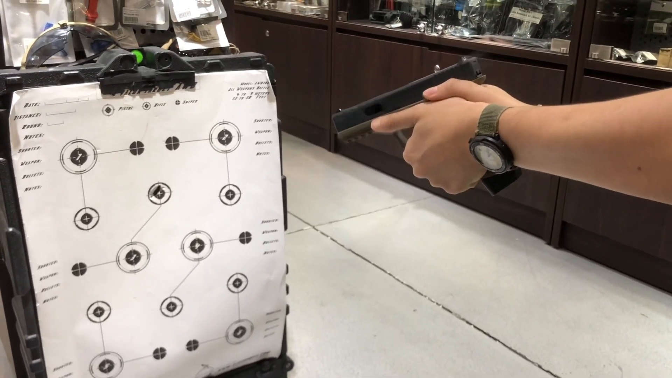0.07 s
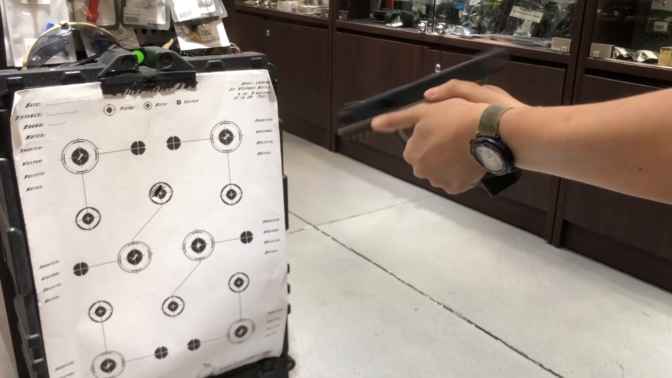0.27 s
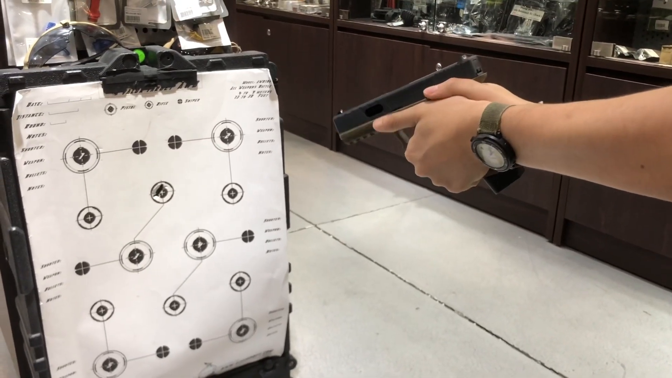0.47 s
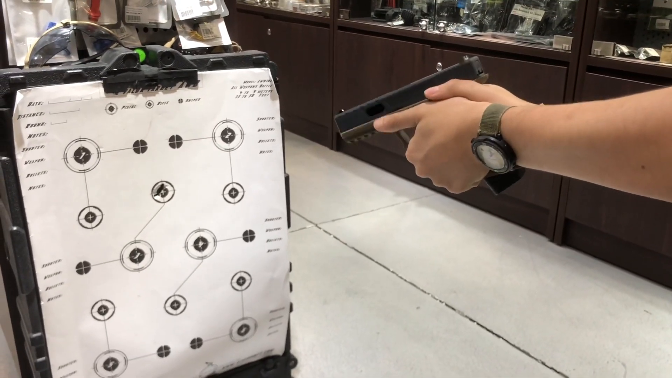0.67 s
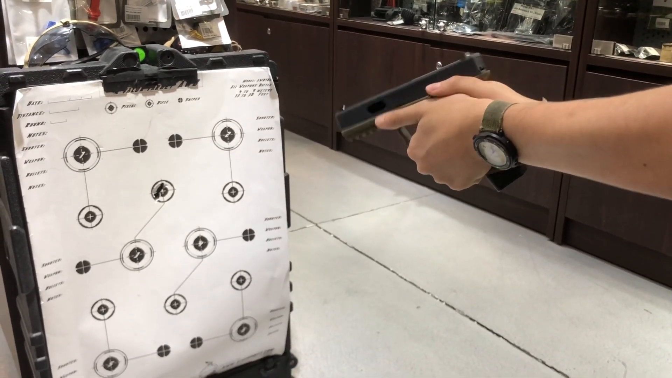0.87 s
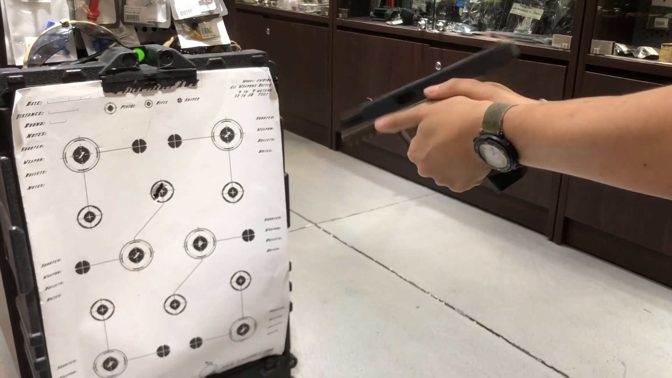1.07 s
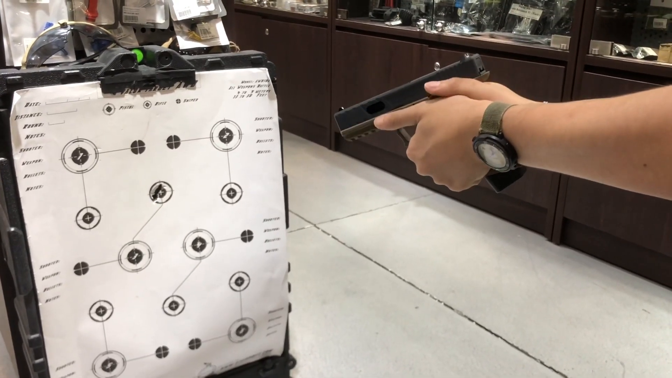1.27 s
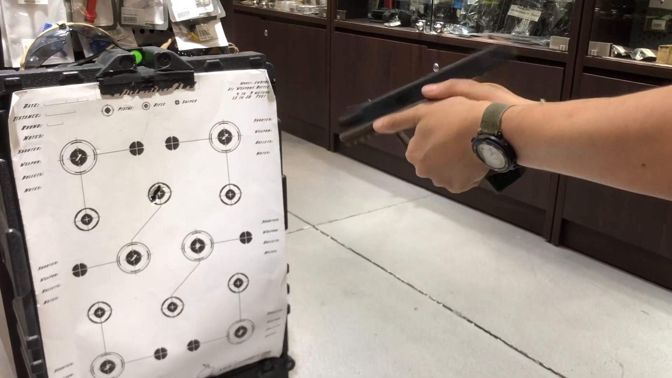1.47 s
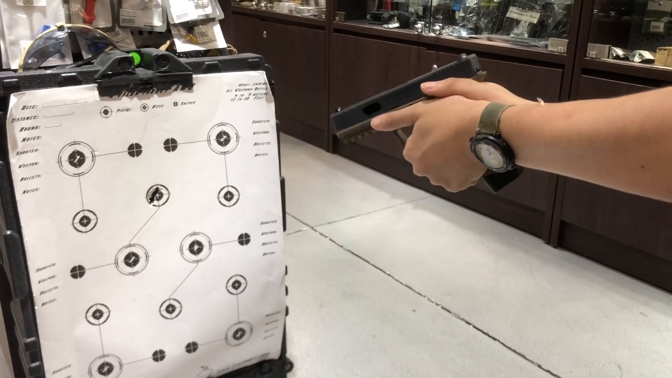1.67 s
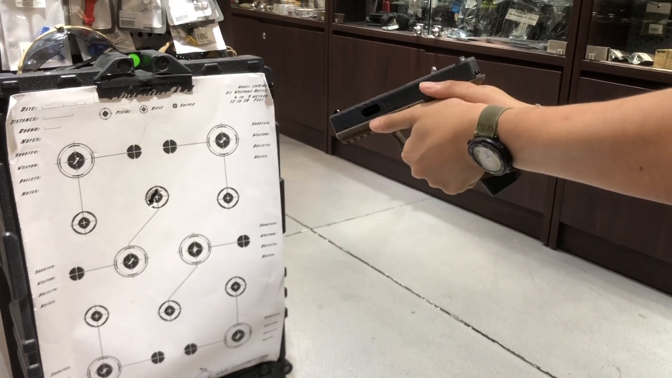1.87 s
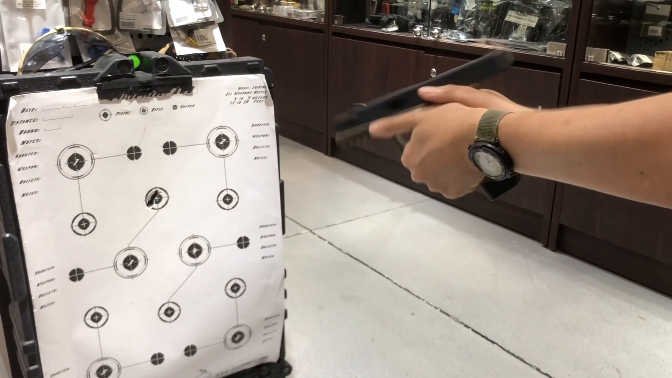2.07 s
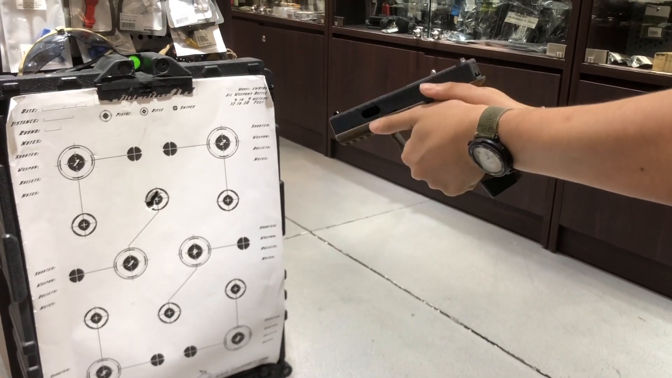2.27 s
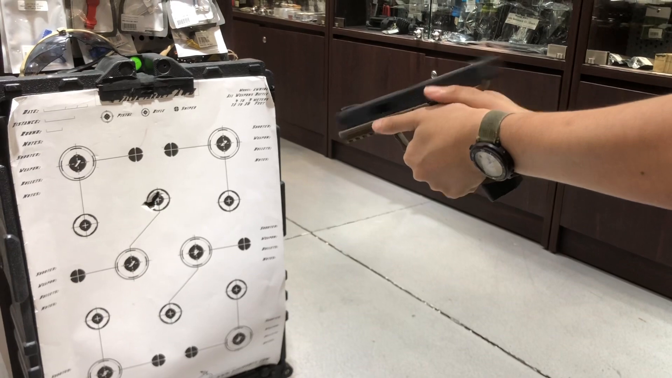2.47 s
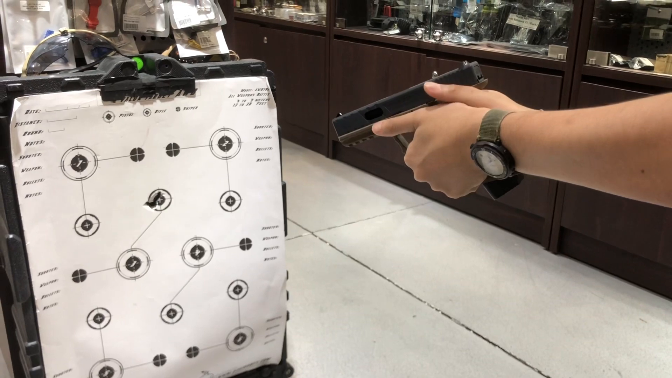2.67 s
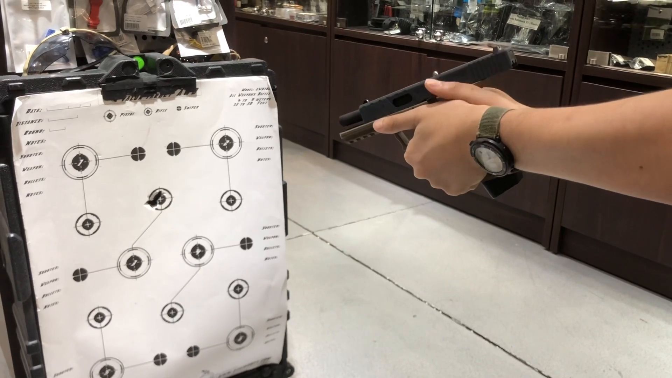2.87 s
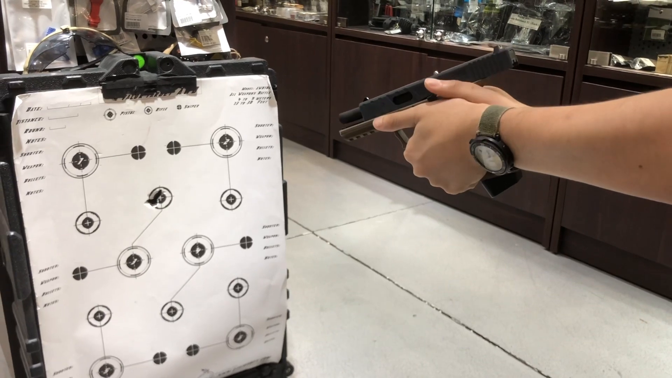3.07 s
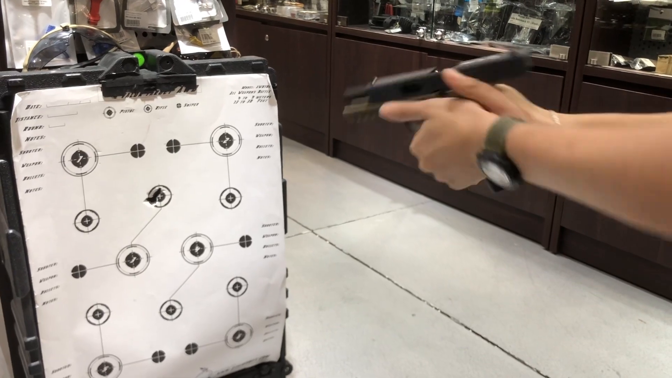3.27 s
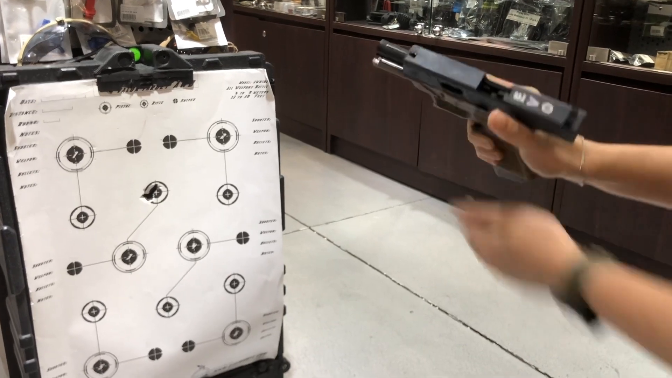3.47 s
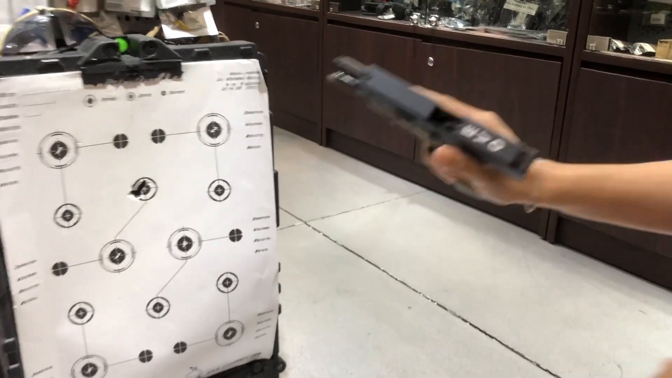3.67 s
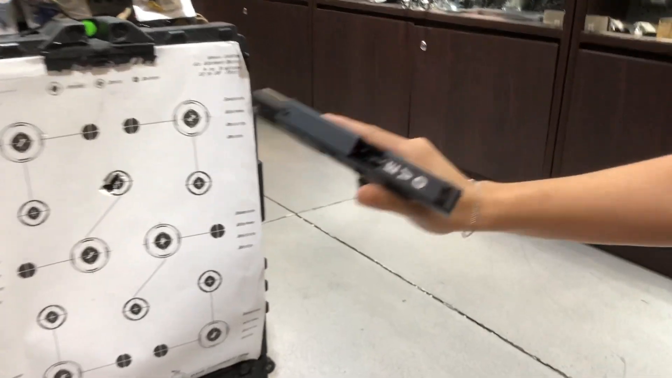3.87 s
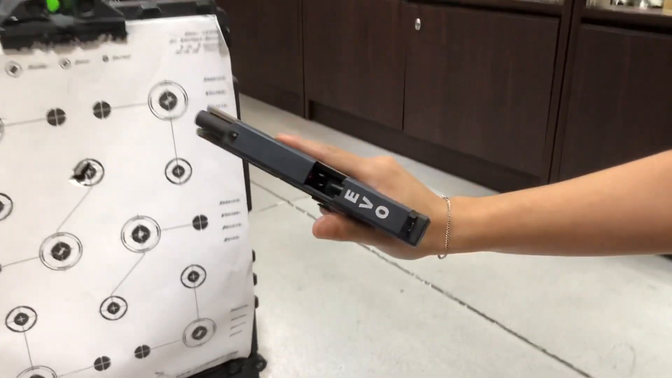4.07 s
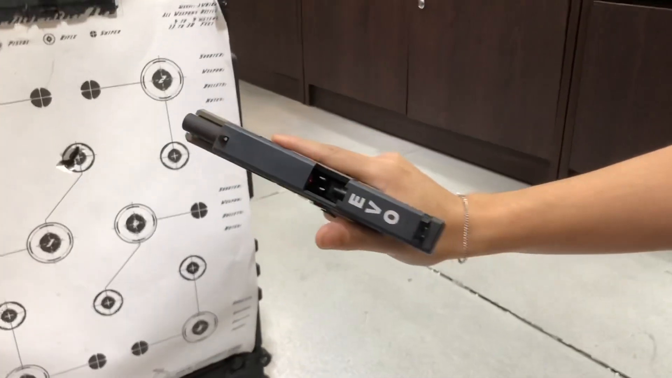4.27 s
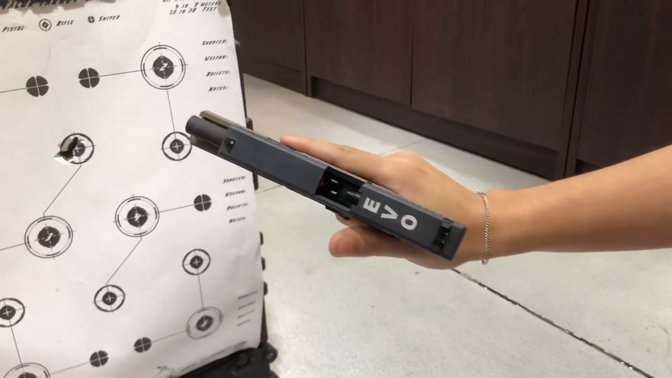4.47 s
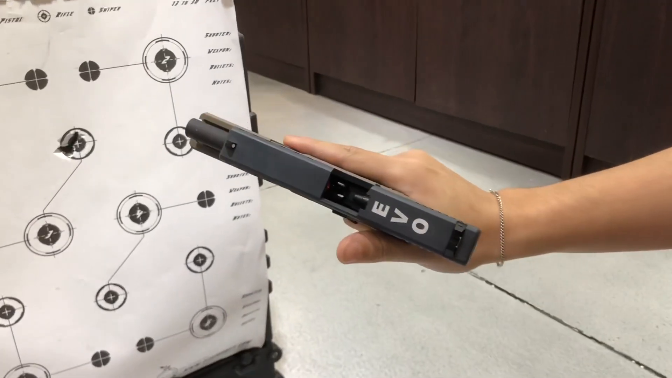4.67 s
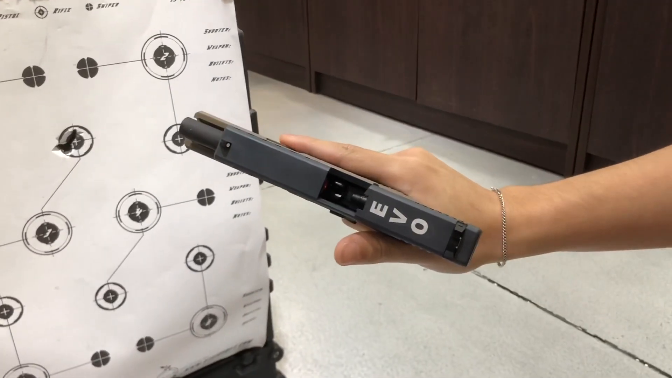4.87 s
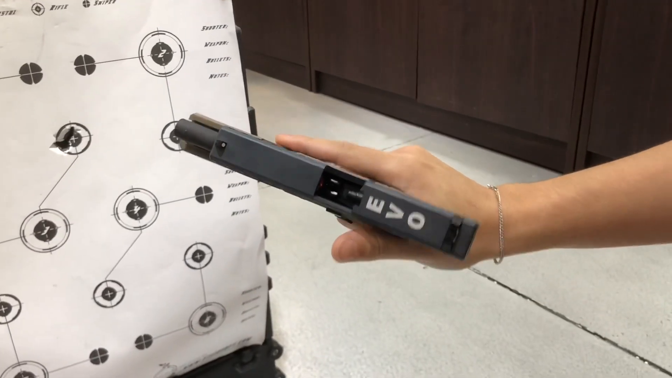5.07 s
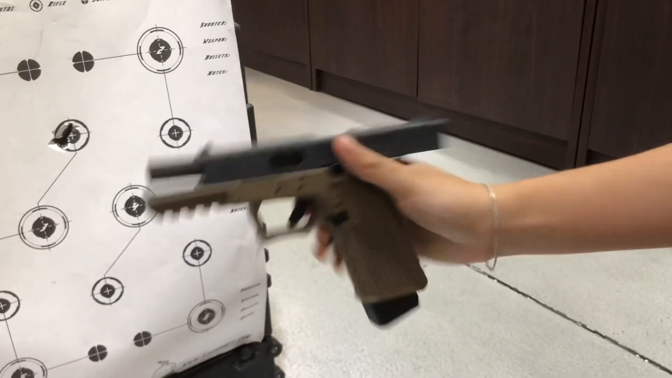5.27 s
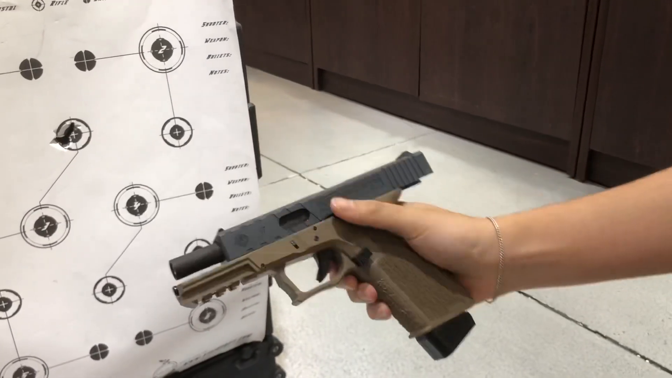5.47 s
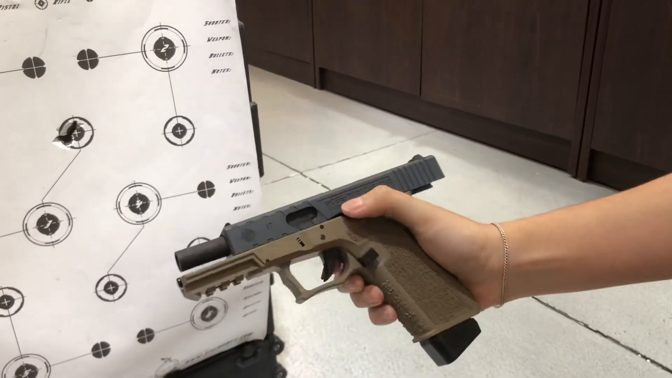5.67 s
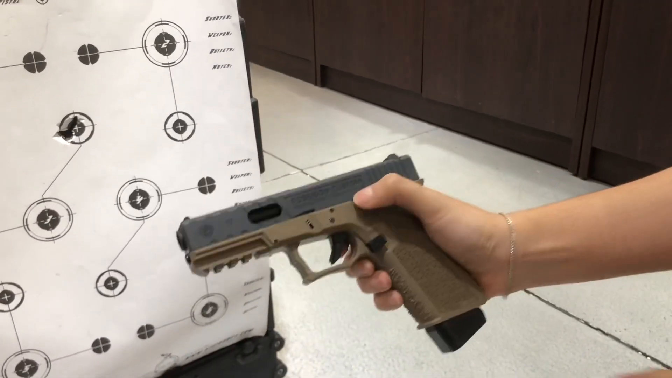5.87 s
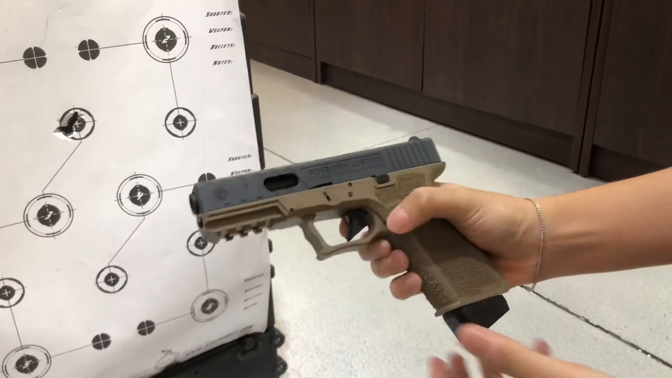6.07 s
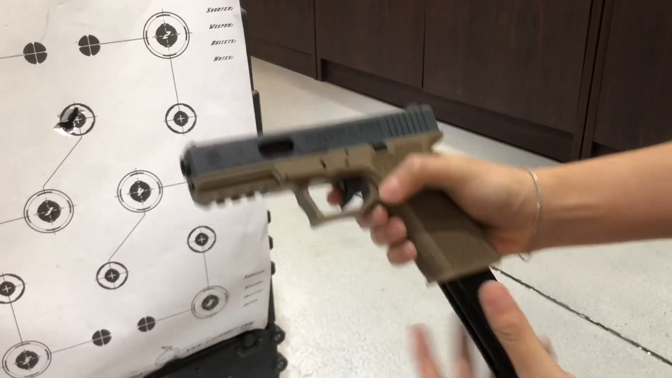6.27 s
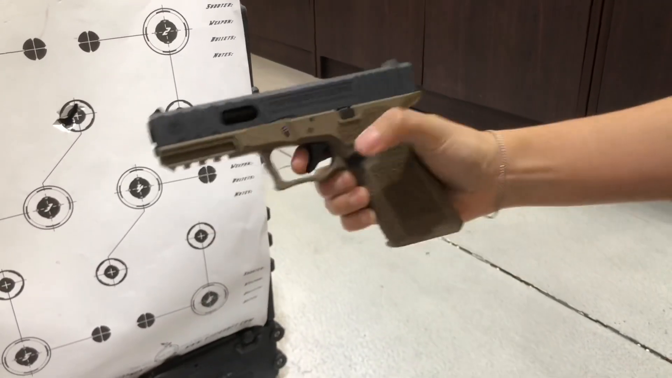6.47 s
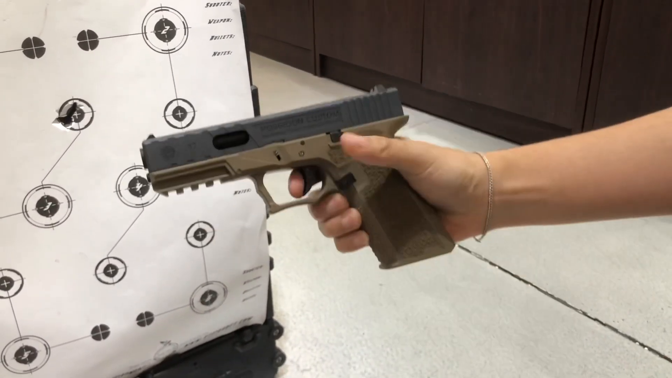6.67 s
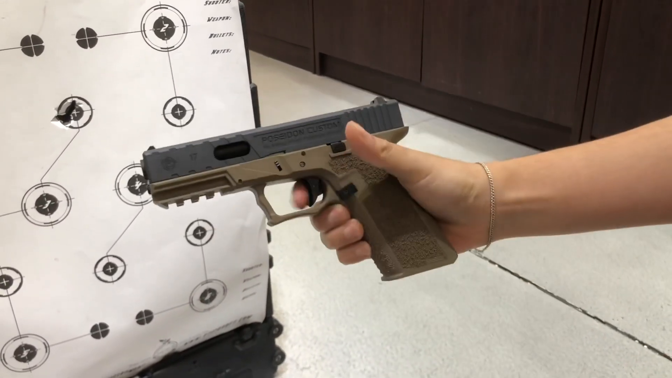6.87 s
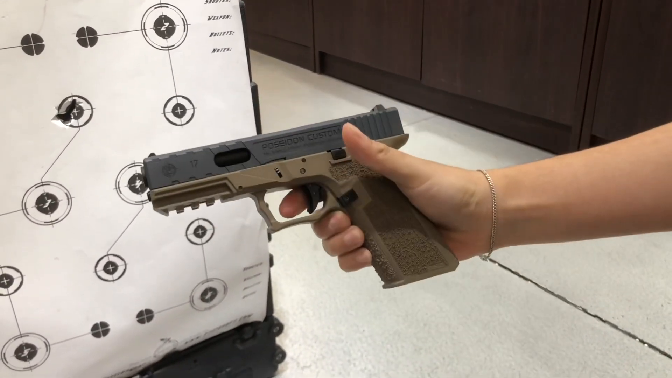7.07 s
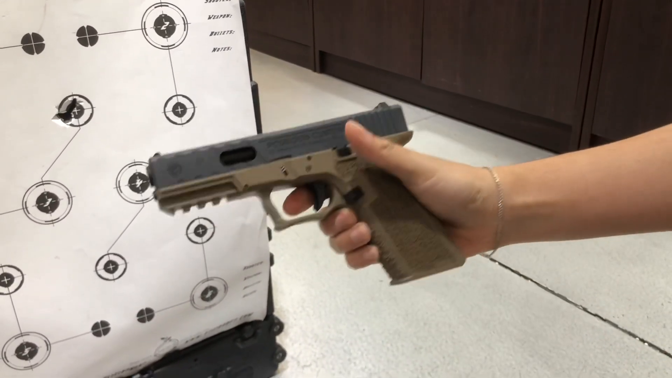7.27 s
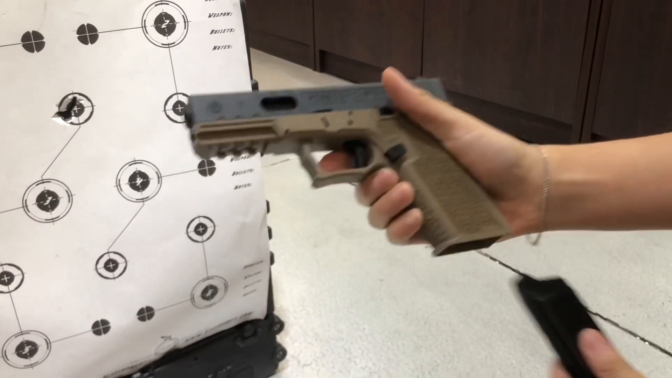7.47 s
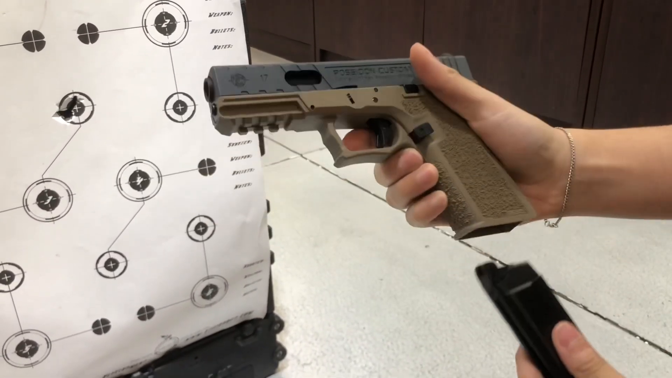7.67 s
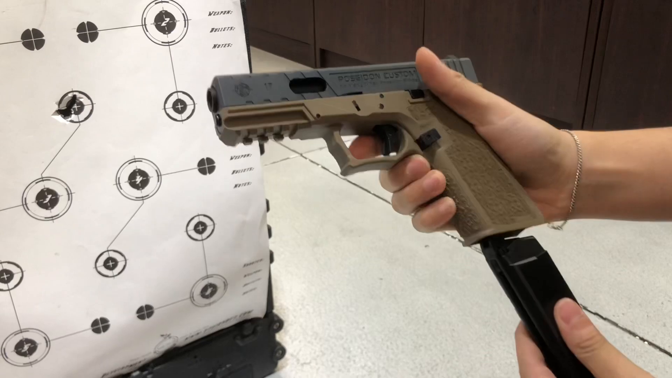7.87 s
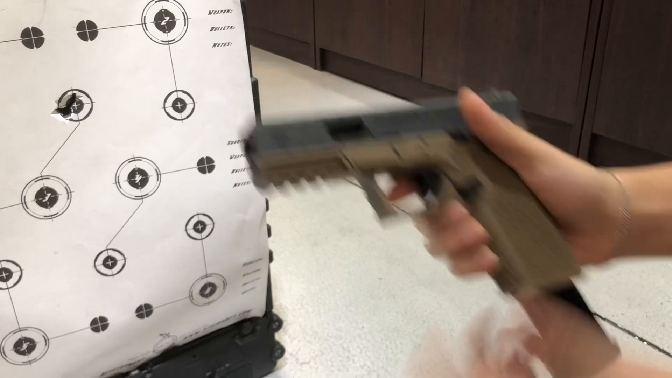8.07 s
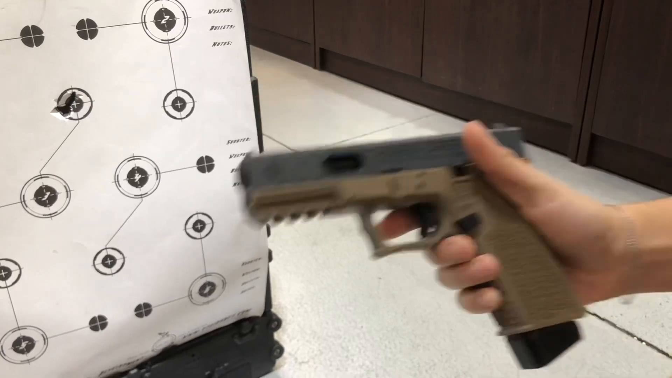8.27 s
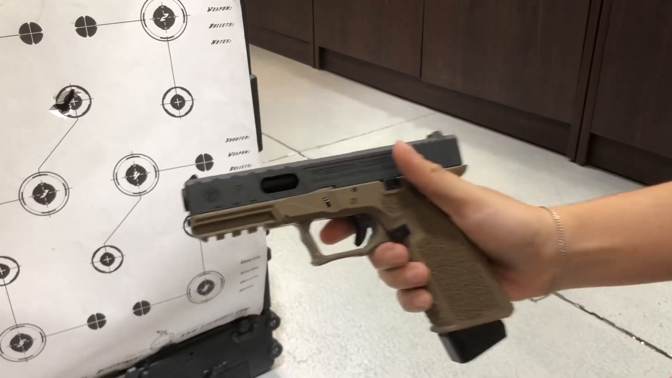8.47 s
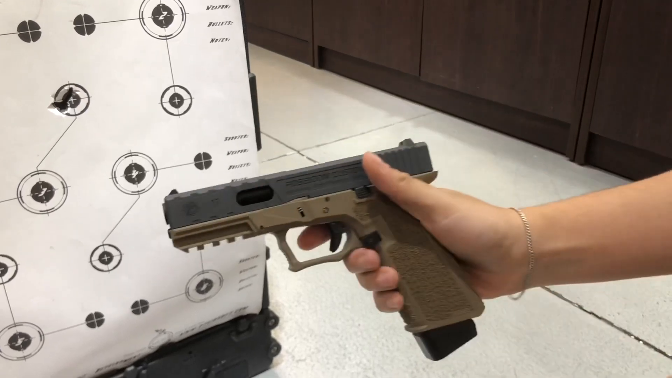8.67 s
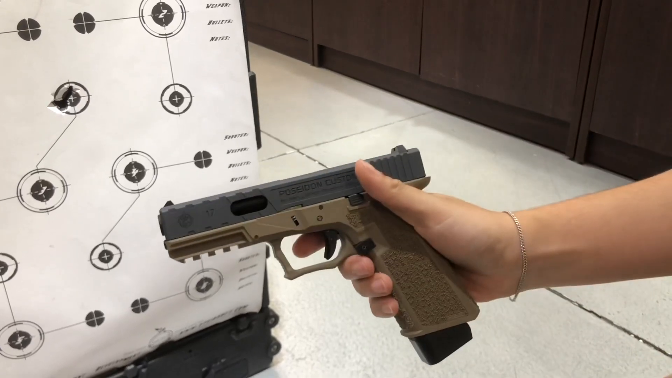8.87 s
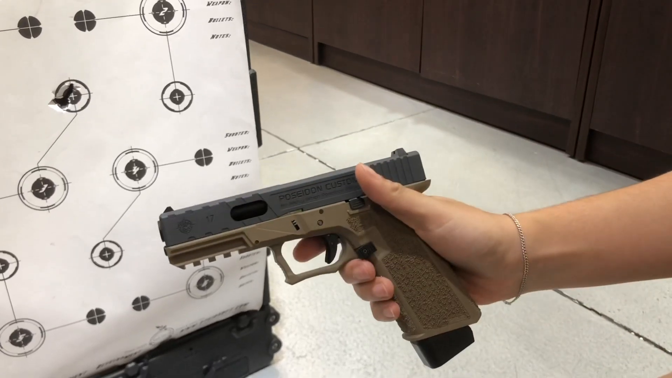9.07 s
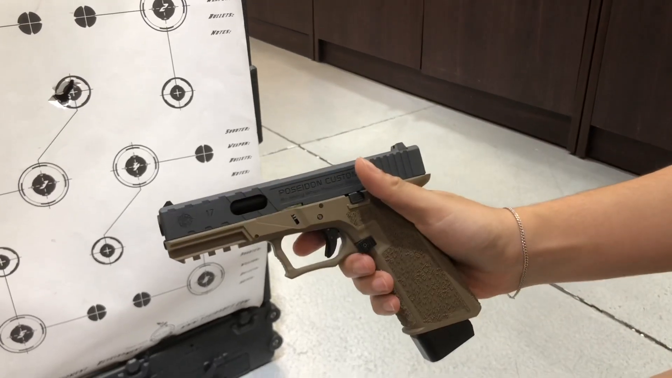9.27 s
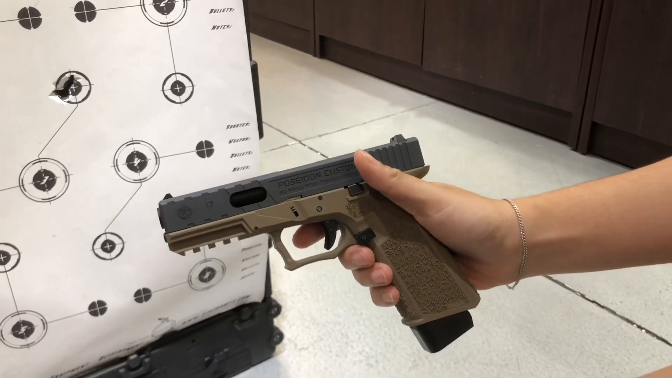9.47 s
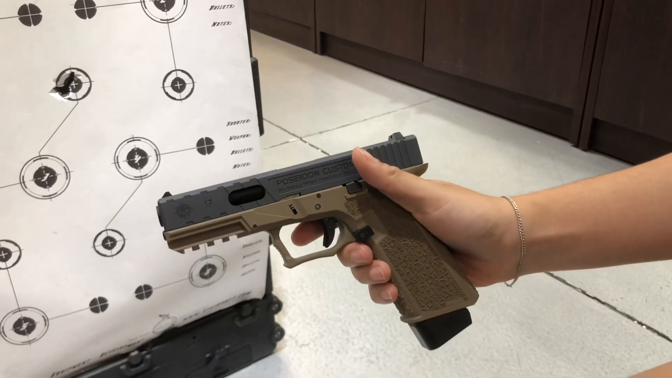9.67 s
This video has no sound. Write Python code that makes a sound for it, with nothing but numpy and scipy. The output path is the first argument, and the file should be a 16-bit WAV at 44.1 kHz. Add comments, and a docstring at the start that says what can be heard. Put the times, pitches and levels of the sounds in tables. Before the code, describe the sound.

Quick, close airsoft pistol shots with a clacking slide, followed by handling clicks and a magazine latching over a soft ventilation hum.

```python
"""Sharp shots, close to the microphone: a gas blowback airsoft pistol is emptied in a shop. Each shot is
a crack of gas, a muzzle puff, the slide's knock on its rear stop and its slam forward; after the last
the slide stays open. Floor, cabinets and ceiling answer from farther off. Then, still up close, the
pistol is turned over, the slide dropped, the trigger pulled dry and a magazine seated. Ventilation
hums in the background, sinking under the shots and swelling back as the recorder rides its gain."""
import sys
import numpy as np
from scipy import signal
from scipy.fft import rfft, irfft, next_fast_len
from scipy.io import wavfile
from scipy.ndimage import uniform_filter1d, minimum_filter1d, map_coordinates

SR = 44100
rng = np.random.default_rng(int(sys.argv[2]) if len(sys.argv) > 2 else 0)


def wav_out(sig):
    """Save sig, one row per channel (or a flat mono array), as 16-bit PCM at SR to the path in sys.argv[1]."""
    wavfile.write(sys.argv[1], SR, np.round(np.clip(np.atleast_2d(sig).T, -1, 1) * 32767).astype(np.int16))


N = 429087
T = np.arange(SR // 2) / SR  # time within one blow, s

# room tone, the rush of the vents: (frequency [Hz], level [dB])
VENT_SPECTRUM = [(15, -32), (25, -10.5), (49, 0), (76, -12), (145, -3.5), (180, -11), (217, -4.5),
                 (309, -5), (439, -11), (659, -11.5), (1100, -20), (2480, -23), (4030, -31.5), (6380, -36),
                 (16000, -47.5)]
# tones of the ventilation: (frequency [Hz], level over the rush [dB])
VENT_TONES = [(48, -8.5), (230, -15), (305, -14.5)]
# a squeak far off the microphone: (frequency [Hz], level [dB])
FAR_SQUEAK_TONES = [(1491, -52)]
# reverberation of the shop: (frequency [Hz], t60 [s])
SHOP_DECAY = [(150, 0.33), (500, 0.31), (1500, 0.26), (5000, 0.26), (9000, .23), (15000, 0.21)]
# resonances between floor and cabinets: (frequency [Hz], level [dB], t60 [s])
CABINET_MODES = [(153.9, -23.5, .2), (240.6, 4.5, 0.12), (408, 1, 0.22), (508, 5, 0.14), (673, -9, 0.32),
                 (978, -13, .22), (1086, 3.5, 0.17)]
# the muzzle's pop out in the room: (frequency [Hz], level [dB])
POP_SPECTRUM = [(50, -17.5), (130, -4.5), (230, -2), (330, -2), (520, -1.5), (1200, -3.5), (2500, -8),
                (6000, -7), (16000, -11.5)]
# the low-mid thud of the pop coming off the ceiling: (frequency [Hz], level [dB])
CEILING_THUD_SPECTRUM = [(100, -14.5), (450, -3), (1150, 2), (2000, -2), (5000, -17.5), (16000, -35.5)]
# hard parts meeting: (frequency [Hz], level [dB])
CONTACT_SPECTRUM = [(100, -34.5), (580, -21.5), (900, -7.5), (1400, 0.5), (3300, -1), (5000, -2.5),
                    (8000, -5), (12000, -8), (16000, -9.5)]
# parts sliding on each other: (start [s], length [s], level [dB])
SCRAPES = [(5.01, 0.032, -42.5), (6.151, 0.13, -40.5), (7.99, 0.11, -38.5), (8.27, 0.2, -57),
           (8.955, 0.11, -59)]
# light clicks of trigger and loose parts: (time [s], level [dB], brightness [dB/octave])
LIGHT_CLICKS = [(2.611, -24.5, -2), (2.883, -40, -4.5), (3.171, -40.5, 1), (3.328, -44.5, -2.5),
                (3.386, -38, 0.5), (5.211, -37.5, -3.5), (5.228, -35.5, -3.5), (5.27, -34, -3),
                (5.277, -27.5, -0.5), (5.297, -36.5, -7), (5.353, -34, -8), (6.128, -23.5, -3),
                (6.159, -34, -5), (6.282, -41, 0), (6.445, -33.5, -4)]
# a catch lets go and a spring drives a part home, first the slide, then the hammer:
# (time [s], catch level [dB], travel [s], blow level [dB], brightness [dB/octave], contact length [s])
SPRING_RELEASES = [(5.7396, -4.5, .0213, -3, 3, 0.0081), (6.6899, -33, .0182, -8, -.9, 0.0039)]
# the frame under the small parts: (frequency [Hz], width [Hz], boost [dB])
FRAME_RESONANCES = [(1150, 150, 3), (1640, 240, 1.5), (3036, 240, 4), (3460, 150, 0), (5230, 160, 0.5),
                    (6700, 266, 4), (10600, 277, 3), (13800, 210, 10), (15350, 320, 8.5)]
# the magazine going up the grip: (time [s], level [dB], brightness [dB/octave], contact length [s])
MAGAZINE_BUMPS = [(7.9107, -36, -4, 0.0059), (7.9593, -28.5, -5.5, 0.0058), (7.992, -30, -6.5, 0.006),
                  (8.0234, -27, -9, 0.0086), (8.0603, -13, -1.5, 0.011), (8.0877, -7.5, 1, 0.0037)]
# the magazine in the grip: (frequency [Hz], width [Hz], boost [dB])
GRIP_RESONANCES = [(2010, 120, 3), (2830, 86, 2), (3440, 330, 8), (9220, 140, 10.5), (11300, 330, 11),
                   (12300, 199, 4.5), (15300, 180, 8)]
# lasting ring of the magazine: (frequency [Hz], level [dB], t60 [s])
MAGAZINE_MODES = [(1940, -3, .1), (1990, -1, 0.15), (2950, 3.5, .035), (3270, 9, .035)]
# slide and frame together: (frequency [Hz], width [Hz], boost [dB])
STEEL_RESONANCES = [(1170, 210, -6.5), (1690, 47, 1), (3530, 57, -5), (4030, 120, 8), (5220, 180, 7),
                    (6470, 250, -3), (8520, 300, 2.5), (13900, 250, 5.5), (15350, 260, 11)]
# lasting ring of the slide: (frequency [Hz], level [dB], t60 [s])
SLIDE_MODES = [(1709, -5, 0.27), (4270, 2, .16), (4300, -7, 0.24), (4260, -0.5, 0.12), (5360, -4, .13),
               (5460, -3.5, .15), (6377, -10.5, .14)]
# escaping gas: (frequency [Hz], level [dB])
GAS_SPECTRUM = [(60, -21.5), (300, -15), (700, -6.5), (1500, -5.5), (4000, 0), (6500, -0.5), (9000, -3.5),
                (12000, -6), (16000, -3.5)]
# barrel and gas chamber: (frequency [Hz], width [Hz], boost [dB])
CHAMBER_RESONANCES = [(890, 110, 6), (1640, 280, 10.5), (2570, 280, 6.5), (4167, 300, 6), (4840, 210, 8),
                      (5630, 300, 9.5), (6490, 520, 10.5), (8380, 600, -0.5), (15200, 600, 7)]
# shots at the microphone: (time [s], puff level over SHOT_DB [dB], thump level over SHOT_DB [dB])
PISTOL_SHOTS = [(0.0474, -16, -35), (0.211, -20.5, -31), (0.3736, -19.5, -25), (0.5174, 3.5, -8),
                (0.67, -20.5, -19), (0.7775, 3.5, -9), (0.897, 4.5, -1.5), (1.0278, -8, -12),
                (1.2673, -0.5, -20), (1.433, -6.5, -4.5), (1.5758, 6, -7.5), (1.7345, -9.5, -3),
                (1.888, -1.5, 0), (2.0181, -20, -28), (2.1462, 8, -3.5), (2.265, -19.5, -31),
                (2.4012, -12.5, -13), (2.672, -13, -28)]

SHOT_DB = -2.5  # base level shared by all the shots


def amp(db):
    """Decibels to gain."""
    return 10 ** (np.asarray(db) / 20)


def unit(x):
    """Scale to rms 1."""
    return x / np.sqrt(np.mean(x ** 2) + 1e-20)


def along(points, hz):
    """(Hz, value) points read on a log axis."""
    f, v = np.transpose(points)
    return np.interp(np.log(hz + 1), np.log(f + 1), v)


def humps(resonances, hz):
    """The dB curve of a set of resonances."""
    return sum(db / (1 + (2 * (hz - centre) / width) ** 2) for centre, width, db in resonances)


def wobble(rate, size=N):
    """A smooth random curve, rate knots a second."""
    knots = rng.standard_normal(int(size * rate / SR) + 4)
    return map_coordinates(knots, [np.arange(size) * rate / SR])


def filtered(x, gain):
    """x times a gain that depends on frequency."""
    size = next_fast_len(len(x) + SR // 2)
    return irfft(rfft(x, size) * gain(np.fft.rfftfreq(size, 1 / SR)), size)[:len(x)]


def coloured(x, spectrum, boost=lambda hz: 0, size=2048):
    """x through a causal filter of unit energy, shaped by (Hz, dB) points plus boost(Hz) in dB."""
    hz = np.fft.rfftfreq(size, 1 / SR)
    cepstrum = irfft(np.log(amp(along(spectrum, hz) + boost(hz))))
    cepstrum[1:size // 2] *= 2  # fold to minimum phase
    cepstrum[size // 2 + 1:] = 0
    response = irfft(np.exp(rfft(cepstrum)))
    return signal.fftconvolve(x, response / np.linalg.norm(response))[:len(x)]


def add(track, s, sound):
    """Mix a sound into the track at time s."""
    part = track[max(round(s * SR), 0):][:len(sound)]
    part += sound[:len(part)]


def arch(length):
    """A rounded swell and fall over length seconds."""
    return np.sqrt(np.abs(np.sin(np.pi * np.minimum(T / length, 1))))


def burst(rise, hold, t60):
    """Noise that swells, holds and dies away."""
    swell = np.minimum(T / rise, 1) ** 2
    return swell * amp(-60 * np.maximum(T - hold, 0) / t60) * rng.standard_normal(len(T))


def ring(modes, scatter_db):
    """Damped modes, their strengths scattered at each strike."""
    hz, db, t60 = np.transpose(modes)[:, :, None]
    strength = amp(db + scatter_db * rng.standard_normal(hz.shape))
    phase = rng.uniform(0, 2 * np.pi, hz.shape)
    partials = strength * amp(-60 * T / t60) * np.sin(2 * np.pi * hz * T + phase)
    return partials.sum(axis=0) * (1 - np.exp(-T / .001))


def contact(body, tilt, hold, t60, grit_db=3, place_db=2.5):
    """Hard parts meet: tiny impacts ring the body, tilted in dB/octave and coloured by where they land."""
    knots = rng.standard_normal(len(T) // 24 + 4)
    grit = amp(grit_db * map_coordinates(knots, [np.arange(len(T)) / 24], order=1))
    place = np.transpose([np.geomspace(800, 16000, 36), place_db * rng.standard_normal(36)])
    boost = lambda hz: humps(body, hz) + along(place, hz) + tilt * np.log2(np.clip(hz, 900, 11000))
    sound = coloured(burst(.00046, hold, t60) * grit, CONTACT_SPECTRUM, boost)
    energy = SR * (hold + t60 / np.log(1e6))  # set by how long the contact lasts
    return sound * np.sqrt(energy) / np.linalg.norm(sound)


def ventilation(rush_db=-44, drone_hz=255, drone_width_hz=150):
    """Room tone: a soft rush of air with slightly unsteady hum, over a steady low drone of the ducts."""
    t = np.arange(N) / SR
    rush = unit(filtered(rng.standard_normal(N), lambda hz: amp(along(VENT_SPECTRUM, hz))))
    rush *= amp(.3 * wobble(6))
    hum = sum(amp(db + 1.8 * wobble(4)) * np.sin(2 * np.pi * hz * t + .9 * wobble(5))
              for hz, db in VENT_TONES)
    duct = lambda hz: 1 / (1 + (2 * (hz - drone_hz) / drone_width_hz) ** 2)
    drone = unit(filtered(rng.standard_normal(N), duct))
    return amp(rush_db) * (rush + hum) + amp(-50.5) * drone


def far_squeak(start_s=4.86, length_s=.12):
    """Far from the microphone, something in the shop gives one faint squeak of steady pitch."""
    out = np.zeros(N)
    for hz, db in FAR_SQUEAK_TONES:
        add(out, start_s, np.sqrt(2) * amp(db) * arch(length_s) * np.sin(2 * np.pi * hz * T))
    return out


def diffuse_tail():
    """Sound from all round the shop: noise that dies faster in the treble."""
    hz, t, spectra = signal.stft(rng.standard_normal(len(T)), SR, nperseg=256)
    decay = amp(-60 * t / along(SHOP_DECAY, hz)[:, None])
    return signal.istft(spectra * decay, SR, nperseg=256)[1][:len(T)]


def lingering_shot():
    """At the start, the faint tail of a shot already hangs in the shop."""
    out = np.zeros(N)
    add(out, 0, amp(-32.5) * coloured(diffuse_tail(), GAS_SPECTRUM))
    return out


def shop_reflections(x, ceiling_s=.017, ceiling_db=-9, early_db=-12, block=16384):
    """Weak near reflections, the ceiling's slap and a short tail, which changes as the pistol moves."""
    out = np.zeros(N)
    build_up = np.interp(T, [0, ceiling_s * .76, ceiling_s], [0, amp(early_db), 1])
    padded, fade = np.pad(x, block), signal.windows.cosine(block)
    tails = [diffuse_tail() * build_up for _ in range(7)]
    for k, start in enumerate(range(-block // 2, N, block // 2)):  # crossfade from tail to tail
        tail = tails[k % len(tails)]
        response = tail / np.linalg.norm(tail)
        add(response, ceiling_s, amp([ceiling_db]))
        echo = signal.fftconvolve(padded[start + block:][:block] * fade, response)
        add(out, max(start, 0) / SR, echo[max(-start, 0):])
    return out


def diffuse_pop():
    """The muzzle's pop, scattered round the shop."""
    return coloured(diffuse_tail() * amp(-60 * T / .93), POP_SPECTRUM) * np.minimum(T / .0089, 1)


def ceiling_thud():
    """The pop comes off the ceiling as a low-mid thud."""
    return coloured(burst(rise=.00051, hold=.004, t60=.051), CEILING_THUD_SPECTRUM)


def muzzle_boom(bounce_hz=480):
    """Each pop travels away from the microphone and comes back off the floor and the cabinets."""
    out = np.zeros(N)
    cabinets = ring(CABINET_MODES, scatter_db=0) * np.minimum(T / .014, 1)
    answer = amp(-8) * diffuse_pop() + amp(-16.5) * cabinets
    floor_bounce = np.sin(2 * np.pi * bounce_hz * T) * (T / .0014 * np.exp(1 - T / .0011)) ** 2
    for s, *_ in PISTOL_SHOTS:
        turbulence = amp(-8) * diffuse_pop()  # never repeats
        add(out, s + .01153, amp(SHOT_DB - 2.5) * floor_bounce)
        add(out, s + .0075, amp(SHOT_DB) * (answer + turbulence))
    return out


def magazine_squeak(start_s=6.397):
    """The magazine squeaks once as it is drawn out, falling in pitch."""
    out = np.zeros(N)
    pitch_hz = 5450 + 1000 * np.exp(-T / .0064) + 220 * wobble(1500, size=len(T))
    phase = 2 * np.pi * np.cumsum(pitch_hz) / SR
    swell = np.minimum(T / .0064, 1) * amp(-60 * np.maximum(T - .018, 0) / .1)
    add(out, start_s, amp(-40.5) * swell * (np.sin(phase) + amp(-16) * np.sin(2 * phase)))
    return out


def mechanism_clicks(click_s=.0043):
    """Close up, trigger and loose parts click on the frame, and springs drive slide and hammer home."""
    out = np.zeros(N)
    clack = lambda db, tilt, hold: amp(db) * contact(FRAME_RESONANCES, tilt, hold, t60=.021, place_db=2.3)
    for s, db, tilt in LIGHT_CLICKS:
        add(out, s, clack(db, tilt, click_s))
    for s, catch_db, travel, blow_db, tilt, hold in SPRING_RELEASES:
        add(out, s, clack(catch_db, tilt, hold=.0019))
        add(out, s + travel, clack(blow_db, tilt, hold))
        add(out, s + travel + .117, clack(blow_db - 26.5, tilt - 3, click_s))  # a faint tick follows
    return out


def magazine_seating():
    """The magazine bumps up the grip, ringing at each touch, and latches."""
    out = np.zeros(N)
    for s, db, tilt, hold in MAGAZINE_BUMPS:
        knock = contact(GRIP_RESONANCES, tilt, hold, t60=.017, place_db=1)
        add(out, s, amp(db) * (knock + amp(-18.5) * ring(MAGAZINE_MODES, scatter_db=4)))
    return out


def scraping():
    """Parts slide on each other in short, grainy strokes."""
    out = np.zeros(N)
    for s, length, db in SCRAPES:
        grains = rng.standard_normal(len(T)) * amp(2.5 * wobble(502, size=len(T)))
        add(out, s, amp(db) * coloured(arch(length) * grains, CONTACT_SPECTRUM))
    return out


def muzzle_puffs(delay_s=.0059):
    """Air from the muzzle reaches the microphone as a quickly falling whoop, then a low thump."""
    out = np.zeros(N)
    pitch_hz = 62 + 920 * np.exp(-T / .0031)
    wave = np.sin(2 * np.pi * np.cumsum(pitch_hz) / SR)
    bump = lambda peak_s, sharpness: (T / peak_s * np.exp(1 - T / peak_s)) ** sharpness
    for s, puff_db, thump_db in PISTOL_SHOTS:
        envelope = amp(puff_db) * bump(.0022, 1.1) + amp(thump_db) * bump(.016, 4.3)
        add(out, s + delay_s, wave * envelope)
    return amp(SHOT_DB) * out


def slide_recoil(travel_s=.0185):
    """Gas throws the slide on its rear stop and vents, just as the ceiling's thud arrives."""
    out = np.zeros(N)
    for s, *_ in PISTOL_SHOTS:
        at_stop = s + travel_s + .00065 * rng.standard_normal()
        knock = contact(STEEL_RESONANCES, tilt=1.9, hold=.0044, t60=.02, grit_db=6.5)
        thud = ceiling_thud()  # about 20 ms after the shot
        exhaust = coloured(burst(rise=.0016, hold=.024, t60=.05), GAS_SPECTRUM)
        add(out, at_stop, amp(-4.5) * knock + amp(-9.5) * thud + amp(-10) * exhaust)
    return amp(SHOT_DB) * out


def slide_slams(cycle_s=.0483, chill_s_per_shot=.00015):
    """The spring slams the slide shut after all shots but the last, later each time as the gas cools."""
    out = np.zeros(N)
    for fired, (s, *_) in enumerate(PISTOL_SHOTS[:-1]):
        slam = contact(STEEL_RESONANCES, tilt=3.5, hold=.002, t60=.03, grit_db=2.5)
        rattle = contact(STEEL_RESONANCES, tilt=3.5, hold=.006, t60=.07)
        ringing = ring(SLIDE_MODES, scatter_db=3.5)
        shut = s + cycle_s + chill_s_per_shot * fired
        add(out, shut, slam + amp(-12) * rattle + amp(-26) * ringing)
    return amp(SHOT_DB + 1) * out


def gas_cracks():
    """Right at the microphone, the trigger creeps, the hammer falls and gas roars through the barrel."""
    out = np.zeros(N)
    chamber = lambda hz: humps(CHAMBER_RESONANCES, hz)
    for s, *_ in PISTOL_SHOTS:
        trigger = contact(STEEL_RESONANCES, tilt=-4.5, hold=.014, t60=.0088)
        roar = coloured(burst(rise=.006, hold=.0076, t60=.017), GAS_SPECTRUM, chamber)
        add(out, s - .016, amp(-34) * trigger)
        add(out, s - .0025, amp(3.5) * roar)
    return amp(SHOT_DB) * out


def scene():
    """One microphone: the pistol close up, the shop's reflections and room tone behind it."""
    firing = gas_cracks() + slide_recoil() + slide_slams()
    handling = mechanism_clicks() + magazine_seating() + scraping() + magazine_squeak()
    close = firing + handling + muzzle_puffs()
    room = shop_reflections(amp(-8.5) * firing + amp(-9) * handling) + lingering_shot() + muzzle_boom()
    return (close + room + ventilation() + far_squeak())[None]


def gain_control(x, limit_db=-12.5, window_s=.027, hold_s=.4, recovery_s=.65, deaf_below_hz=700):
    """Loud sounds, bass aside, turn the recorder's gain down at once; it waits, then creeps back up."""
    window, hold = int(window_s * SR), int(hold_s * SR)
    sensed = filtered(x, lambda hz: hz ** 2 / (hz ** 2 + deaf_below_hz ** 2))
    level_db = 10 * np.log10(np.abs(uniform_filter1d(sensed ** 2, window)) + 1e-12)
    needed_db = minimum_filter1d(np.minimum(limit_db - level_db, 0), window)
    held_db = minimum_filter1d(needed_db, hold, origin=(hold - 1) // 2)
    fading = np.exp(-np.arange(N) / SR / recovery_s)
    gain_db = np.minimum.accumulate(held_db / fading) * fading  # each cut fades until a deeper one comes
    return x * amp(uniform_filter1d(gain_db, window // 10))


def record(dry, peak=.93, hardness=4, top_hz=16000):
    """The recorder rides its gain, rounds off the highest peaks and keeps nothing above its band limit."""
    held = gain_control(dry[0])
    rounded = held / (1 + np.abs(held / peak) ** hardness) ** (1 / hardness)
    return filtered(rounded, lambda hz: np.clip((top_hz - hz) / 350, 0, 1))[None]


dry = scene()
out = record(dry)
wav_out(out)
```